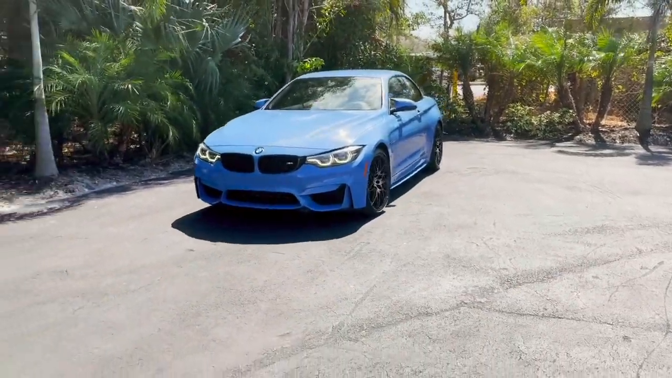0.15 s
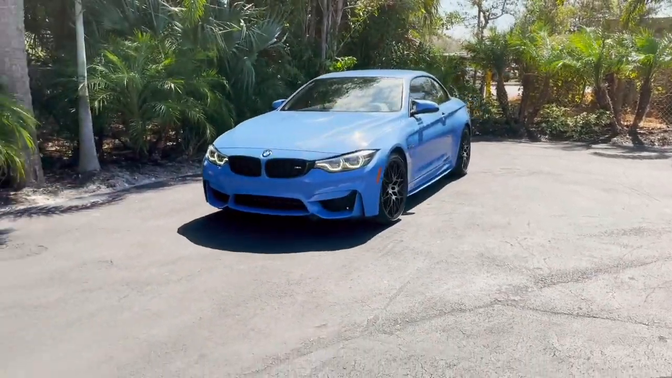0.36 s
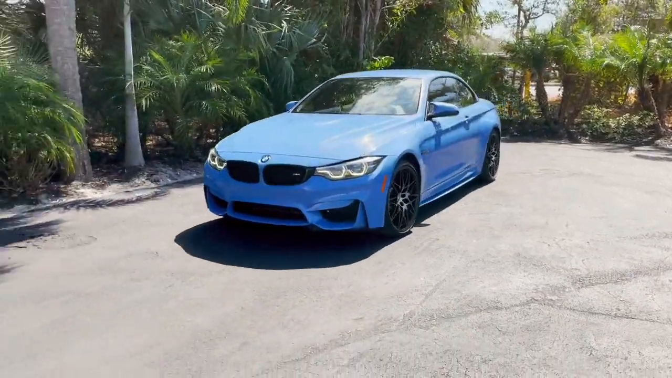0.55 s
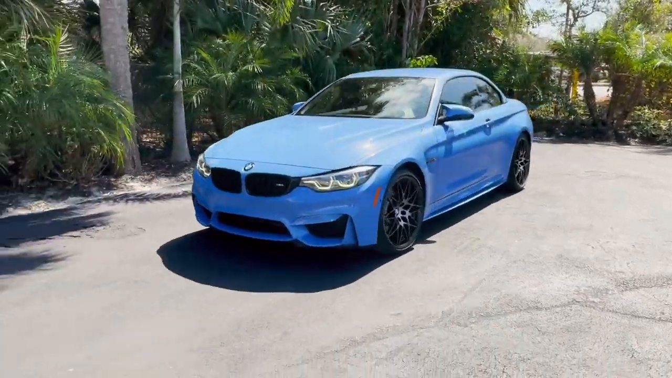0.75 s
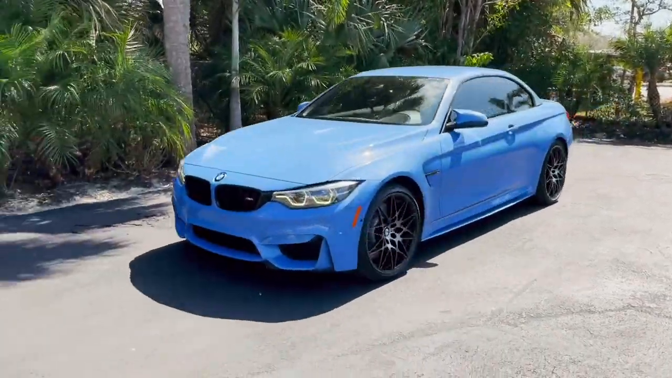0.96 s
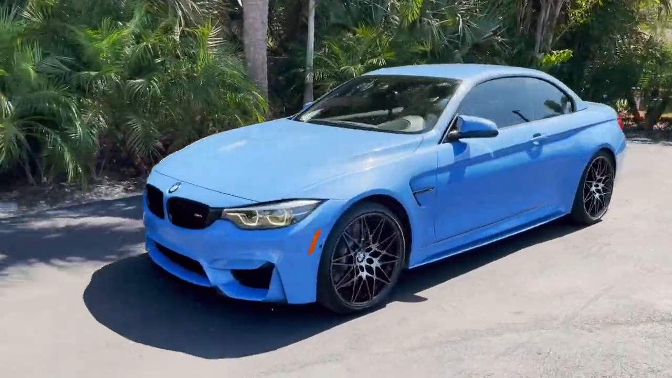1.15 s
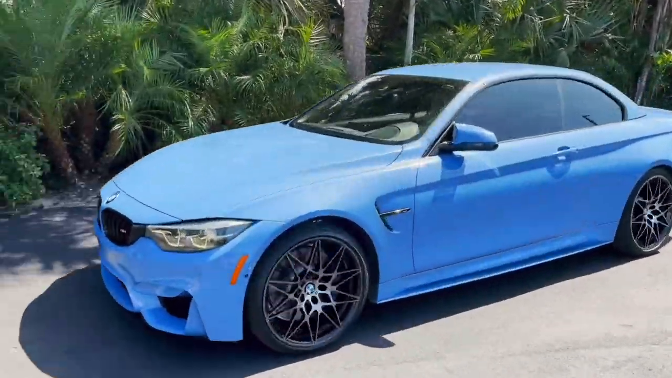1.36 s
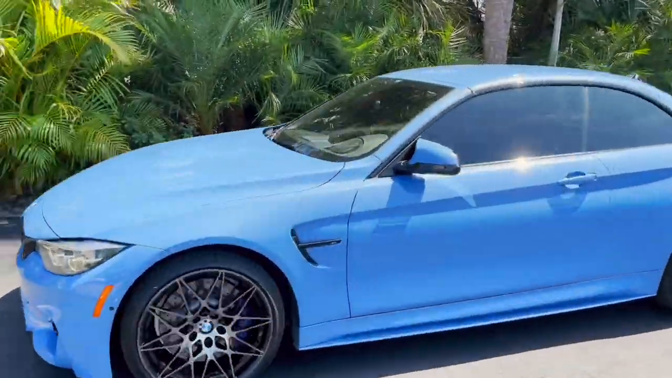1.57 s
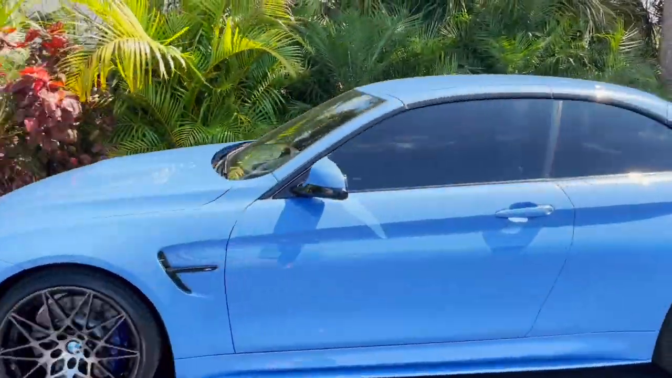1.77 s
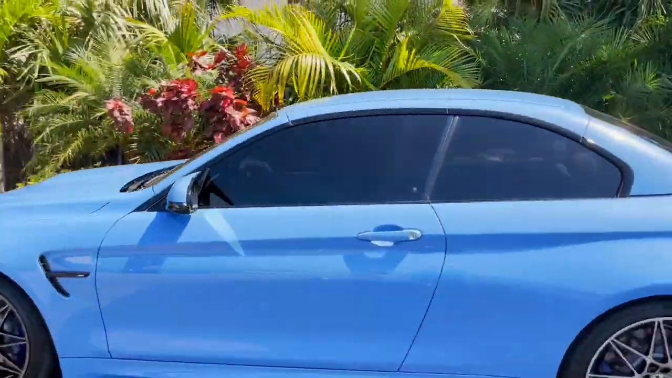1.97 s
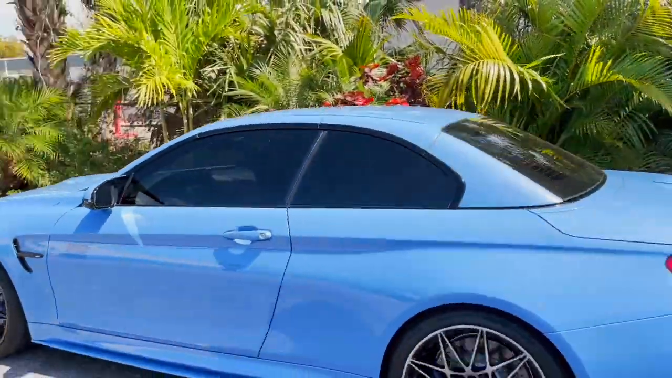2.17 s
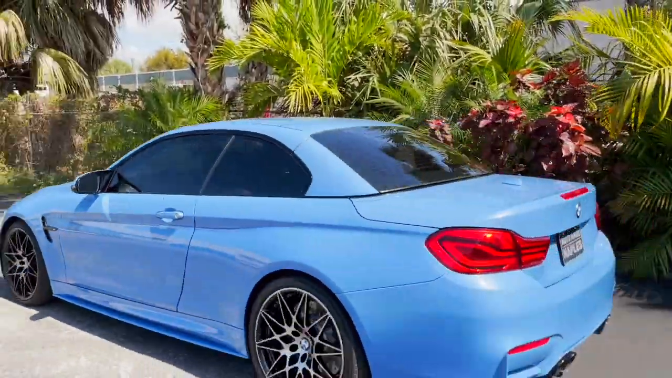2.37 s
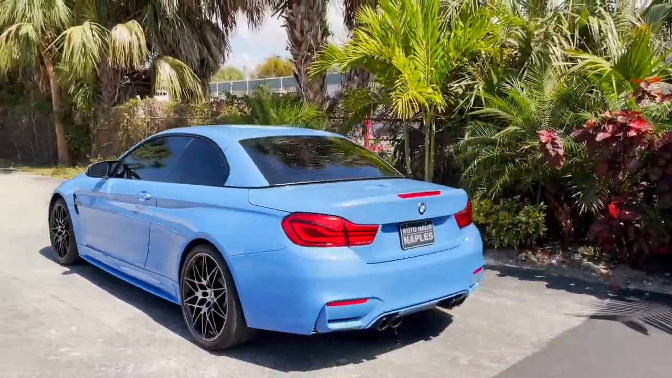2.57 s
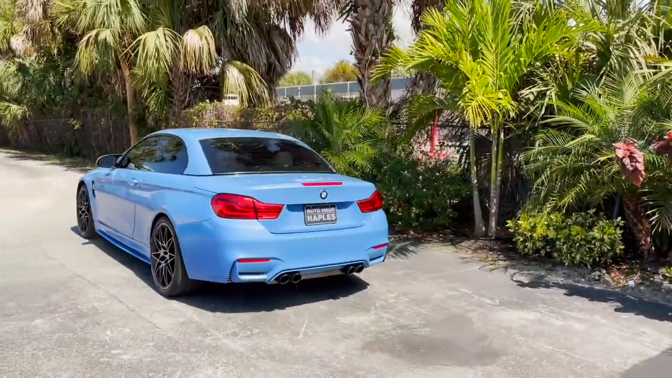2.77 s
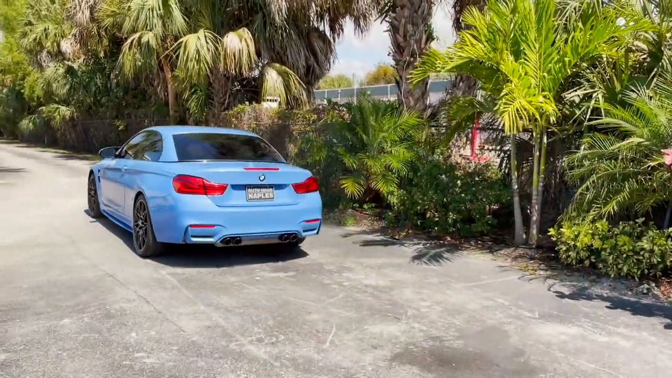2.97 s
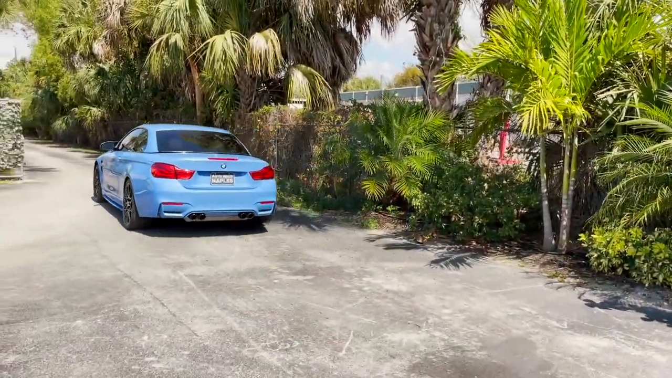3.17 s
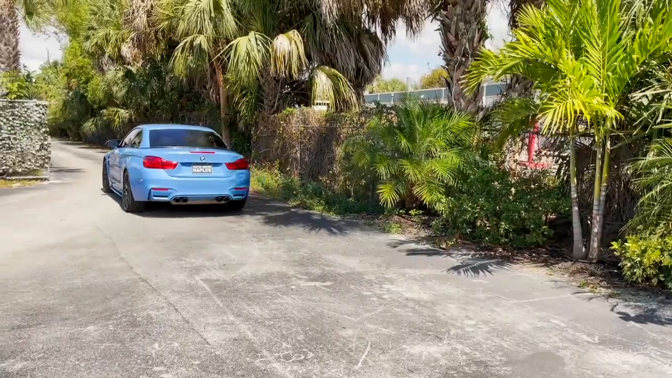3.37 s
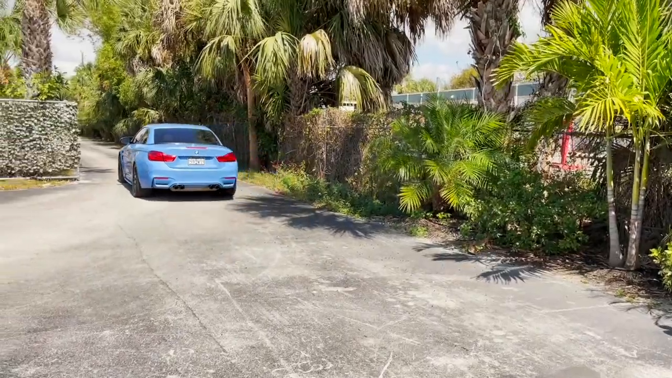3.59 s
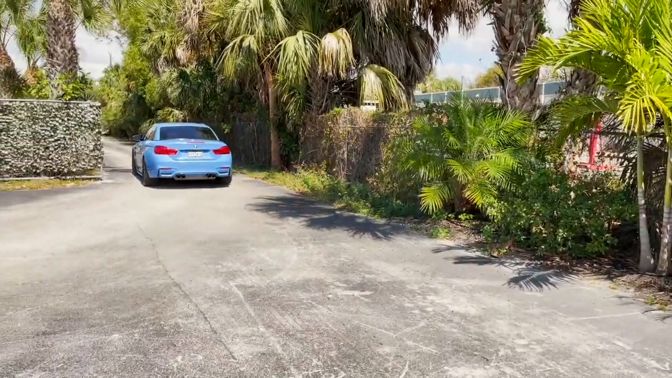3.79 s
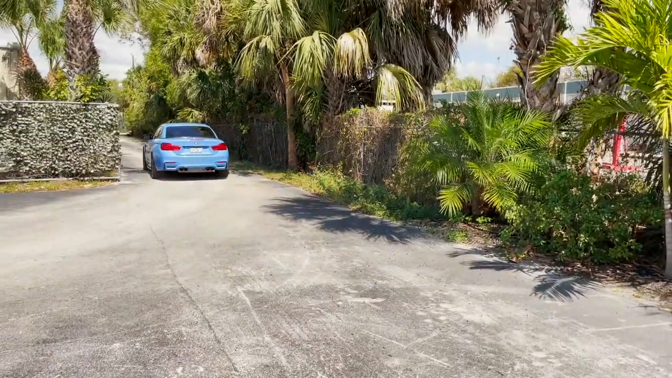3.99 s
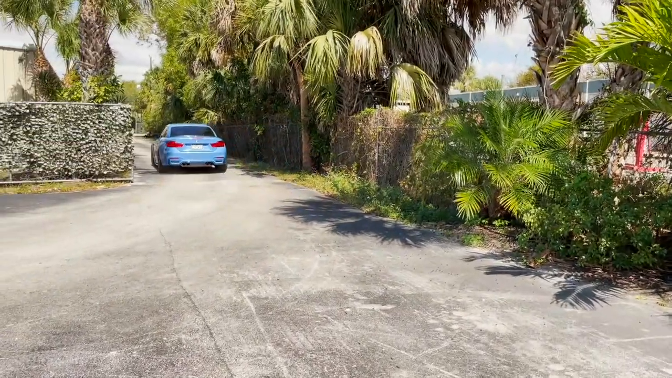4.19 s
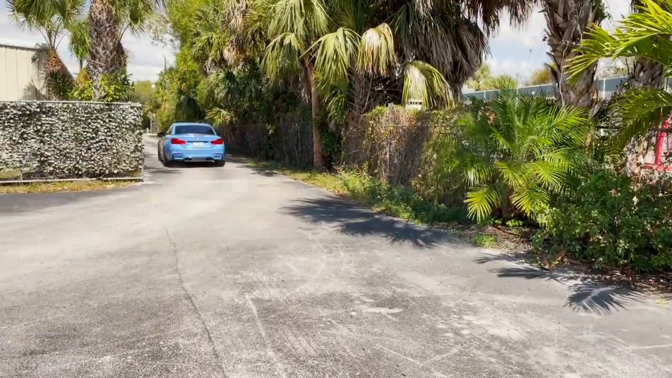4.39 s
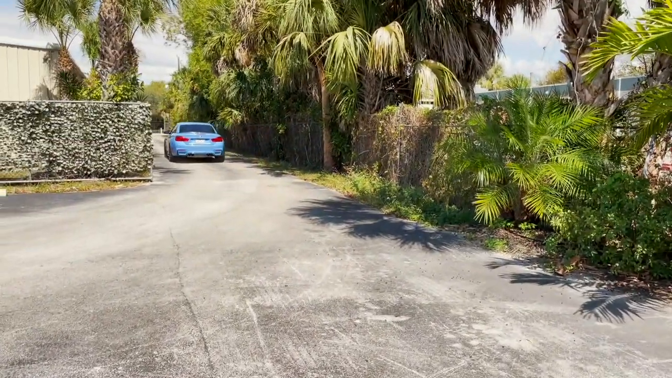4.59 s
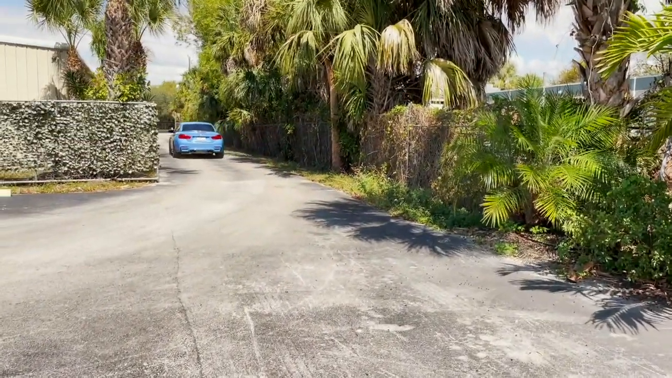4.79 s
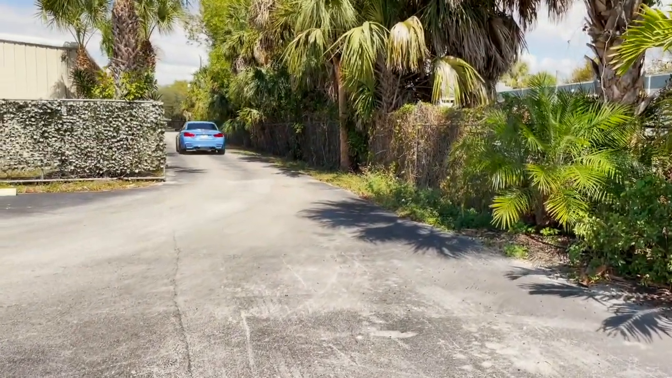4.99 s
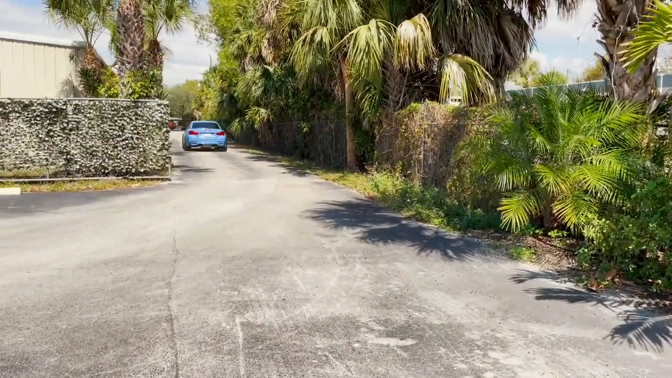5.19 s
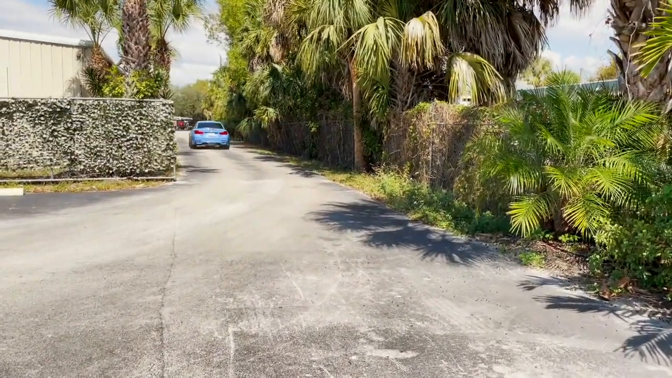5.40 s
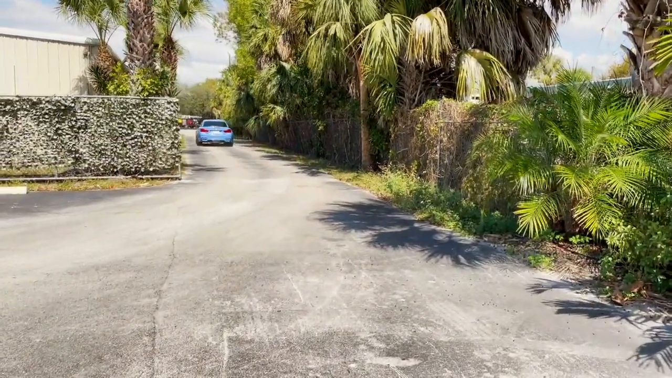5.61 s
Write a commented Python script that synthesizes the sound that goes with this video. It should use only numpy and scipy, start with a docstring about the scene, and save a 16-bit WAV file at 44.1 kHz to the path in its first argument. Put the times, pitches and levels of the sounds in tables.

```python
"""Wind buffets a two-port microphone over the far wash of a lane as a six-cylinder sports car pulls away.
Its exhaust pulses hum and rasp, and brief drones swell over engine roar and tyre hiss.
The car shifts up at about 2.4 s and rolls past; grit crackles and the roar turns duller.
It shifts up again at about 4.2 s and fades down the lane, leaving wind and a few ticks."""
import sys
import numpy as np
from scipy import signal
from scipy.io import wavfile
from scipy.ndimage import uniform_filter1d

SR = 44100
rng = np.random.default_rng(int(sys.argv[2]) if len(sys.argv) > 2 else 0)


def dump_mix(stems):
    """Bounce the given channels to the path in sys.argv[1] as a 16-bit WAV at rate SR."""
    frames = np.atleast_2d(stems).T  # one column per channel
    limited = np.clip(frames, -1, 1)  # hard clip at full scale
    pcm = np.round(limited * 32767).astype(np.int16)
    wavfile.write(sys.argv[1], SR, pcm)


N = 249165
T = np.arange(N) / SR
COARSE = T[::64]  # time grid for slow changes


def gain_of(db):
    """Decibels to gain."""
    return 10 ** (np.asarray(db) / 20)


def play(rows, t):
    """Each column of a time table at times t."""
    times, *columns = np.transpose(rows)
    return [np.interp(t, times, column) for column in columns]


def read(rows, hz, column=1):
    """One column of a frequency table at hz, on a log scale."""
    columns = np.transpose(rows)
    return np.interp(np.log(hz + 1), np.log(columns[0] + 1), columns[column])


def drift(size, count):
    """Smooth random curves on the coarse grid, changing over about size samples."""
    x = rng.standard_normal((count, len(COARSE)))
    x = uniform_filter1d(uniform_filter1d(x, size // 64), size // 64)
    return x / x.std(axis=1, keepdims=True)


def rear_share(t, pass_s=2.74, turn_s=.33):
    """Rises from 0 (we face the car's nose) to 1 (we face its tail)."""
    return 1 / (1 + np.exp((pass_s - t) / turn_s))


def lean(db):
    """Left and right gains that even out after the car passes; positive db leans left."""
    tilt = gain_of(db * (1 - rear_share(T - .3)) / 2)
    return np.array([tilt, 1 / tilt])


def noise(field, patchy_db, flicker_db, size=1024):
    """Uneven stereo noise; field(hz, t) gives its tone and level in dB."""
    # stereo width, very wide near 9 kHz and centred above 12 kHz:
    # f/Hz, difference over sum/dB, share due to delay/0-1
    width = [(60, -3, 0.5), (333, -14, 0.3), (633, -1, 0.94), (1230, -7.5, 0.5), (1590, 0, 0.6),
             (4220, -2, .4), (6890, 0.5, .4), (8190, 12, .4), (8330, 38, 0.2), (8740, 41, 0),
             (9970, 1.5, 0.26), (10350, 6.5, 0), (12000, -35, 0.1)]
    hop = size // 4
    hz, t = np.fft.rfftfreq(size, 1 / SR), np.arange(N // hop + 5) * hop / SR
    a, b, c, d, patches = rng.standard_normal((len(t), len(hz), 5)).T
    patches = uniform_filter1d(uniform_filter1d(patches, 12, axis=0), 12, axis=1)
    flicker = uniform_filter1d(rng.standard_normal(len(t)), 3)
    tone_db, level_db = field(hz, t)
    tone = gain_of(tone_db) / np.sqrt(np.sum(gain_of(tone_db) ** 2, axis=0))
    level = tone * gain_of(level_db + patchy_db * patches / patches.std() + flicker_db * flicker)
    split = np.arctan(gain_of(read(width, hz)))[:, None]  # between sum (mid) and difference (side)
    lag = np.clip(read(width, hz, column=2), 0, 1)[:, None]
    mid = a + 1j * b
    side = 1j * lag * mid + np.sqrt(1 - lag ** 2) * (c + 1j * d)  # delay sets it a quarter cycle off
    spectra = np.array([np.cos(split) * mid, np.sin(split) * side]) * level
    mid, side = signal.istft(spectra, nperseg=size, noverlap=size - hop)[1][:, :N]
    return np.array([mid + side, mid - side])


def hum(rate, phase, level_db, trims_db):
    """Exhaust pulses make five low tones, at 1 to 5 times the firing rate."""
    # tone ahead of the car and behind it: f/Hz, level/dB
    front = [(40, -10), (60, -2), (72, -3), (82, -5.5), (100, 10.5), (122, 1.5), (145, 0), (165, -7),
             (185, -14), (240, -9), (262, -3.5), (295, -19.5), (325, -13), (410, -12.5)]
    back = [(45, 7), (53, -2.5), (60, -0.5), (66, -6.5), (92, -2.5), (118, 0), (132, -6.5), (157, -7.5),
            (180, -28.5), (210, -21.5), (235, -15.5), (265, -27), (330, -16)]
    # for each tone: lag behind the pulse/rad
    lags = (2.3, 0, -.5, 1.5, .3)
    # for each tone: base depth of shaking by gusts/dB
    depths = (1.6, 1.0, 1.5, 2.5, 2.5)
    out, rear = np.zeros(N), rear_share(COARSE)
    shakes = drift(size=1500, count=5)
    for k, trim_db, lag, depth, shake in zip(range(1, 6), trims_db, lags, depths, shakes):
        tone_db = rear * read(back, k * rate) + (1 - rear) * read(front, k * rate)
        gust_db = depth * (1 - rear + .21 * rear) * np.clip(shake, -3, 1.3)
        level = np.sqrt(2) * gain_of(level_db + tone_db + trim_db + gust_db)
        out += np.interp(T, COARSE, level) * np.cos(k * phase - lag)
    return out


def rasp(rate, phase, level_db, uneven, odd_db):
    """High multiples of the firing rate; uneven cylinders add tones at the thirds between them."""
    # tone through the tailpipes and through the engine bay: f/Hz, level/dB
    pipe = [(200, -11), (330, -9), (440, -16), (545, -4.5), (590, -5), (630, -8.5), (672, -3), (698, 0),
            (770, -3), (820, -11), (880, -22.5), (1000, -25.5), (1250, -19), (1600, -56), (2200, -22)]
    bay = [(200, 4), (280, -6), (400, -13.5), (500, -19), (630, -8.5), (710, -18), (800, -5), (870, -5),
           (950, -9.5), (1200, -22.5), (1450, -35), (1620, -39), (1800, -38), (1950, -40)]
    out, rear = np.zeros(N), rear_share(COARSE)
    level_db = level_db + 1.5 * (1 - rear) * drift(size=1200, count=1)[0]
    thirds = np.delete(np.arange(10, 78), [2, 5])  # multiples 4 and 5 belong to the hum
    wavers, wanders = drift(size=4000, count=len(thirds)), drift(size=3500, count=len(thirds))
    for third, waver, wander in zip(thirds, wavers, wanders):
        hz = third / 3 * rate
        share = np.clip(uneven, 0, 1) if third % 3 else gain_of(odd_db * (third % 2))
        tone_db = rear * read(pipe, hz) + (1 - rear) * read(bay, hz)
        level = share * gain_of(level_db + tone_db + (2.8 - 1.8 * rear) * waver)
        offset = (1 - .72 * rear) * wander + 2 * np.pi * rng.random()
        out += np.interp(T, COARSE, level) * np.cos(third / 3 * phase + np.interp(T, COARSE, offset))
    return out


def exhaust():
    """Hum and rasp follow the engine's speed and reach the two ports along with the drones."""
    # engine: t/s, firing rate of three cylinders/Hz, hum level/dB, rasp level/dB
    engine = [(0, 40.5, -43.5, -76.5), (.79, 39.88, -27.5, -43.5), (.9, 43.65, -33.5, -43),
              (1.03, 47.22, -27, -37.5), (1.095, 48.38, -33, -34), (1.13, 49.3, -29.5, -41),
              (1.19, 50.57, -27, -33), (1.27, 55.6, -27, -34), (1.34, 57.65, -24, -30.5),
              (1.54, 62.27, -21.5, -27), (1.65, 68.68, -26, -26), (2.09, 80.99, -17.5, -27.5),
              (2.25, 81.9, -17.5, -23.5), (2.325, 81.65, -24.5, -25), (2.35, 75.02, -16, -21),
              (2.39, 71.64, -19, -26), (2.42, 67.55, -12.5, -24), (2.45, 59.6, -17, -22.5),
              (2.49, 56.16, -18, -26.5), (2.6, 53.17, -20, -31.5), (2.86, 52.13, -20.5, -25.5),
              (3.05, 53.5, -20, -24), (3.19, 55.9, -18, -22.5), (3.27, 56.06, -18, -24),
              (3.33, 57.6, -18.5, -24), (3.4, 58.75, -16, -24), (3.48, 58.45, -17.5, -24),
              (3.6, 61.6, -16, -23), (3.69, 61.58, -16.5, -25), (3.96, 64.43, -19, -28),
              (4.16, 65.38, -21.5, -30), (4.22, 57.4, -17, -29), (4.25, 52.35, -21.5, -38),
              (4.31, 48.14, -19.5, -36), (4.5, 46.87, -21.5, -43.5), (4.6, 45.9, -25.5, -46),
              (4.65, 45.61, -32, -47), (5.08, 46.7, -24.5, -39.5), (5.25, 46.36, -34.5, -41),
              (5.65, 46.4, -48, -53)]
    # exhaust balance: t/s, cylinder unevenness/0-1, odd rasp tones/dB, hum tone 1/dB,
    # hum tone 3/dB, hum tones 4 and 5/dB, left minus right/dB
    balance = [(0, 0, 23.5, -29, -45, 2.5, -14), (.7, 0.85, 2.5, -10, -13, -4, -8.5),
               (1.0, .5, 2.5, -16, -21, -7, -2.5), (1.15, 0.07, 7, -5, -6.5, -9, -5),
               (1.4, 0.42, -4, -16, 1.5, -6, -4.5), (1.55, 0.35, -9, -6, 5.5, -3, -2.5),
               (1.8, 0.5, -1, 2.5, 2.5, -5, -4.5), (2.0, 0.6, -2, -2, -1, -3, -4),
               (2.17, 0.47, -4, -3, -3.5, -12, -4), (2.31, 0.53, -5, 4.5, 6.5, 7.5, -1),
               (2.36, 0.65, -10, 7, -2, -22, -2.5), (2.41, 0.28, -15, -1, 2, -13, -4),
               (2.45, 0.17, -21, -1, 10.5, -1.5, -2), (2.6, 0.39, -16, 4, 0.5, -4, -2),
               (3.1, 0.19, -12, -7, 1, 0.5, -0.5), (3.4, 0.22, -6.5, -13, 4.5, -2, 0.5),
               (3.7, 0.04, -1.5, -10.5, -2, -4.5, -0.5), (4.15, 0.18, 2.5, -3.5, 3, -1.5, -1.5),
               (4.4, 0.2, 4, -22, -13, 1, -1), (5.65, 0.07, -25, -13, -32, -1, -0.5)]
    rate, hum_db, rasp_db = play(engine, COARSE)
    uneven, odd_db, first_db, third_db, top_db, pan_db = play(balance, COARSE)
    phase = 2 * np.pi * np.cumsum(np.interp(T, COARSE, rate)) / SR
    droning = drones()
    low = hum(rate, phase, hum_db, (first_db, 0, third_db, top_db, top_db))
    high = droning + rasp(rate, phase, rasp_db, uneven, odd_db)
    left, right = low + high * lean(db=-1.5)
    right = np.interp(T - 2.4 / SR, T, right)  # the right port is a little farther away
    tilt = gain_of(np.interp(T, COARSE, pan_db) / 2)
    return np.array([left * tilt, right / tilt])


def rings(peaks, hz):
    """The boost in dB around each pitch at which something rings."""
    return sum(db / (1 + (2 * (hz - f) / width) ** 2) for f, width, db in peaks)


def engine_roar():
    """The engine bay's whirr gives way to the car's duller rear, with a hiss of boost."""
    # loudness of the roar: t/s, level/dB
    loudness = [(0, -36.5), (.96, -30.5), (1.16, -27.5), (1.78, -22.5), (2.34, -21.5), (2.63, -27),
                (2.94, -29), (4.04, -27.5), (4.44, -33.5), (5.65, -34)]
    # tone ahead of the car and behind it: f/Hz, level/dB
    front = [(90, -32), (200, -3), (300, -12.5), (500, -11), (820, -9.5), (1120, -14), (1870, -14),
             (2800, -21.5), (4300, -30.5), (6500, -28.5), (8500, -41.5), (10500, -35.5), (13000, -61)]
    back = [(90, -42), (180, -13.5), (320, -7), (430, -19), (700, -11.5), (1000, -13.5), (1300, -16.5),
            (2000, -22), (2800, -35.5), (4500, -42), (6500, -49.5), (9000, -48.5), (13000, -56)]
    # ringing ahead and behind: f/Hz, width/Hz, boost/dB
    front_rings = [(629, 43, 8.5), (750, 78, 7), (1160, 59, 6.5), (1640, 83, 10.5), (2190, 52, 3),
                   (5640, 200, -16)]
    back_rings = [(3470, 140, 4), (3840, 320, 12), (4900, 160, 1)]
    # how much the ringing stands out: t/s, strength/0-1
    ringing = [(0, 0.1), (.4, 0.55), (1.2, 1), (1.75, 0.93), (2, 0), (2.3, 0.82), (2.55, 0.66), (2.9, 0),
               (3.25, 0.99), (3.6, 0.71), (3.9, 0.01), (5.65, 0.01)]

    def field(hz, t):
        rear, strength = rear_share(t), play(ringing, t)[0]
        sagged_hz = np.outer(hz, 1 + .0098 * t)  # the front ringing slowly sinks in pitch
        front_db = read(front, hz)[:, None] + strength * rings(front_rings, sagged_hz)
        back_db = read(back, hz)[:, None] + np.outer(rings(back_rings, hz), strength)
        return front_db * (1 - rear) + back_db * rear, play(loudness, t)[0]
    return lean(db=.5) * noise(field, patchy_db=.89, flicker_db=.9)


def lane(level_db=-42):
    """The steady, far-off wash of the neighbourhood."""
    # tone of the wash: f/Hz, level/dB
    tone = [(71, -51), (120, -6.5), (164, 1.5), (316, -25), (463, -9), (726, -11.5), (941, -32),
            (1260, -5.5), (2800, -37.5), (6530, -31.5), (7500, -41), (9750, -85), (16500, -120)]
    return noise(lambda hz, t: (read(tone, hz)[:, None], level_db), patchy_db=1.2, flicker_db=.4)


def tyres(closest_s=2.2, span_s=.6, fizz_db=7):
    """Tread hisses on dusty asphalt, brightest when the car is near."""
    # loudness of the hiss: t/s, level/dB
    loudness = [(0, -49.5), (.5, -50.5), (1.2, -44), (2, -44.5), (2.42, -44), (2.55, -50.5), (2.8, -44.5),
                (3.3, -47.5), (3.54, -45), (3.65, -51.5), (3.87, -47), (4.06, -51.5), (4.25, -51),
                (4.5, -62), (4.8, -65), (5.15, -59), (5.65, -68)]
    # tone of the hiss: f/Hz, level/dB
    tone = [(2500, -23), (4500, -10.5), (7000, 0), (9000, -2), (11000, -9.5), (14500, -7), (16000, -9)]

    def field(hz, t):
        near_db = fizz_db * np.exp(-((t - closest_s) / span_s) ** 2)
        return read(tone, hz)[:, None] + np.outer(hz > 10000, near_db), play(loudness, t)[0]
    return noise(field, patchy_db=2.3, flicker_db=1.7)


def wind():
    """Air hits the microphone: a lumpy rumble and short, single thumps."""
    # loudness of the rumble: t/s, level/dB
    loudness = [(0, -26.5), (.15, -29), (.35, -36.5), (.7, -34), (1, -27), (1.4, -24.5), (1.9, -31.5),
                (2.2, -22), (2.36, -24.5), (2.7, -21.5), (3, -29), (3.5, -31.5), (4, -28), (4.5, -35),
                (5, -32), (5.65, -30.5)]
    # tone of the rumble: f/Hz, level/dB
    tone = [(20, -47), (40, 2), (58, 28), (90, 6.5), (160, -15.5), (300, -3.5), (500, -31), (900, -58),
            (2000, -110)]
    # thumps of air: t/s, level/dB, f/Hz
    thumps = [(0.214, -23.5, 57.3), (0.248, -17, 229), (0.634, -27, 245), (0.784, -20.5, 250),
              (0.857, -20.5, 204), (0.925, -22, 262), (1.068, -15.5, 235), (1.187, -30, 240),
              (1.25, -16.5, 196), (1.328, -13, 235), (2.089, -37, 78.3), (2.196, -9.5, 85.2),
              (4.809, -24, 89.8), (4.857, -15.5, 72.05), (4.876, -20.5, 191.5), (4.93, -33, 69.05),
              (5.075, -17, 90.1), (5.229, -20, 93.8), (5.354, -19, 68.9), (5.391, -18, 51.2),
              (5.516, -23.5, 99.8)]
    out = noise(lambda hz, t: (read(tone, hz)[:, None], play(loudness, t)[0]),
                patchy_db=2.2, flicker_db=2.6)
    for start, db, hz in thumps:
        swings = (T - start) * hz - .6  # counted from the thump's middle
        out += gain_of(db) * np.exp(-(swings / .69) ** 2) * np.cos(2 * np.pi * swings - .5)
    return out


def drones(waver_db=2.3, wander_rad=.75):
    """Brief, unsteady tones swell and fade: resonances as the car nears, exhaust overtones behind it."""
    # drones: start t/s, length/s, first f/Hz, last f/Hz, level/dB
    tones = [(1.22, 0.38, 835, 856, -30.5), (.72, 0.34, 847, 863, -41), (1.109, 0.11, 1125, 1175, -38),
             (1.514, 0.3, 258.6, 267.2, -27), (1.56, 0.15, 1205, 1224, -34), (1.604, 0.28, 625, 640, -33),
             (1.679, 0.17, 800.3, 805, -28.5), (1.72, 0.07, 1800, 1810, -34),
             (1.783, 0.18, 858, 889, -27.5), (1.917, 0.13, 807, 821, -29), (1.966, .1, 605, 623, -30),
             (1.988, 0.23, 385.2, 408, -30), (2.059, 0.22, 619, 628, -28.5), (2.29, 0.071, 814, 814, -30),
             (2.328, 0.115, 771, 760, -26), (0.359, 0.3, 1660, 1596, -46.5), (1.243, 0.17, 1605, 1615, -39),
             (1.416, 0.09, 1617, 1623, -37.5), (1.501, 0.14, 1714, 1727, -35.5),
             (2.238, 0.12, 1582, 1595, -33.5), (2.177, 0.16, 735, 731, -31),
             (0.319, 0.27, 1095, 1070, -46.5), (.85, .1, 1160, 1145, -48), (1.119, 0.073, 1690, 1684, -41),
             (1.24, 0.073, 1860, 1890, -41), (1.35, 0.13, 1265, 1230, -41), (1.441, 0.085, 1405, 1405, -37),
             (1.446, .07, 1920, 1970, -41), (1.758, 0.085, 1895, 1894, -40), (1.879, 0.11, 1585, 1580, -48),
             (2.028, 0.075, 2300, 2270, -38), (2.105, 0.18, 1624, 1640, -41), (2.14, .09, 1972, 1990, -41),
             (2.26, 0.075, 2025, 2080, -41), (3.069, 0.16, 1105, 1131, -43), (3.417, 0.16, 1224, 1261, -49),
             (3.641, 0.33, 1217, 1281, -42), (3.967, 0.22, 1020, 1068, -40.5),
             (4.279, 0.13, 1170, 1144, -44), (4.29, .2, 622, 608.3, -36), (4.43, .12, 760, 744, -39)]
    out = np.zeros(N)
    wavers, wanders = drift(size=900, count=len(tones)), drift(size=1500, count=len(tones))
    for (start, length, first_hz, last_hz, db), waver, wander in zip(tones, wavers, wanders):
        span = slice(round(start * SR), round((start + length) * SR))
        t = T[span]
        progress = np.clip((t - start) / length, 0, 1)
        phase = 2 * np.pi * np.cumsum(first_hz + (last_hz - first_hz) * progress) / SR
        phase += np.interp(t, COARSE, wander_rad * wander)
        level = np.sqrt(2) * gain_of(db + waver_db * np.interp(t, COARSE, waver))
        out[span] += level * np.sin(np.pi * progress) * np.cos(phase)
    return out


def grit():
    """Grit ticks and crackles: quickly dying bursts of noise, a little different left and right."""
    # ticks: t/s, level/dB, f/Hz, width/octaves, decay time/ms
    ticks = [(2.8128, -33, 11500, .9, 4), (2.817, -37, 5500, 1.6, 12), (2.8228, -33, 12500, .7, 7),
             (2.838, -47, 6500, .5, 8), (3.064, -34, 6700, .3, 5), (3.0655, -35, 3600, 1.2, 12),
             (4.8315, -46, 12000, .8, 1.3), (4.9, -45, 13000, .6, 1.3), (4.906, -56, 12500, .6, 6),
             (4.992, -52, 6900, .3, 4), (5.097, -47, 8500, .8, 1.6), (5.1685, -53, 13500, .4, 1.5),
             (5.252, -26, 1450, .7, 2.2)]
    out, t = np.zeros((2, N)), np.arange(3000) / SR
    for (start, db, hz, octaves, ms), hiss in zip(ticks, rng.standard_normal((len(ticks), 2, len(t)))):
        burst = hiss * np.exp(-t * 1000 / ms) * np.minimum(t * 4000 / ms, 1)
        band = signal.butter(3, [hz / 2 ** (octaves / 2), hz * 2 ** (octaves / 2)], "bandpass", fs=SR)
        burst = signal.lfilter(*band, burst)
        mid, side = gain_of(db) * burst / abs(burst).max(axis=1, keepdims=True)
        mid = signal.lfilter(*signal.iirnotch(8900, 8, SR), mid)  # very wide near 9 kHz
        side = signal.lfilter(*signal.butter(4, 10500, fs=SR), side)  # the highest treble is centred
        first = round(start * SR)
        out[:, first:first + len(t)] += mid + .65 * side * np.array([[1], [-1]])
    return out


def scene():
    """All the sounds added up, left and right."""
    return exhaust() + engine_roar() + lane() + tyres() + wind() + grit()


def record(dry):
    """The microphone drops the deepest bass; then the highest treble is cut."""
    dry = signal.sosfilt(signal.butter(4, 42, "highpass", fs=SR, output="sos"), dry)
    lowpass = signal.firwin(511, 15880, window=("kaiser", 9), fs=SR)
    return signal.oaconvolve(dry, lowpass[None], "same")


dry = scene()
out = record(dry)
dump_mix(out)
```